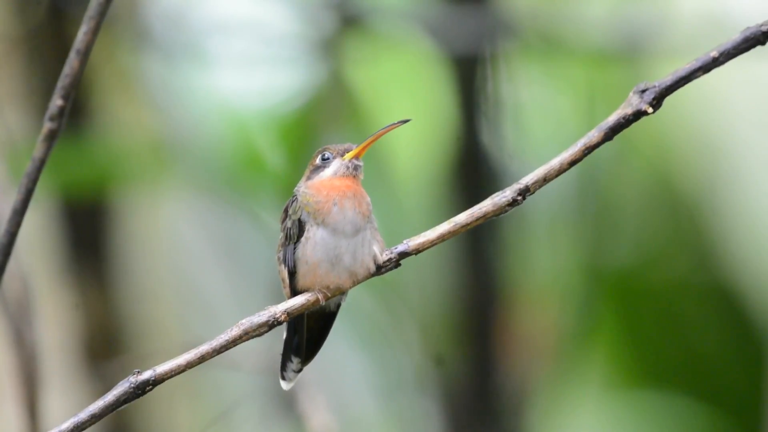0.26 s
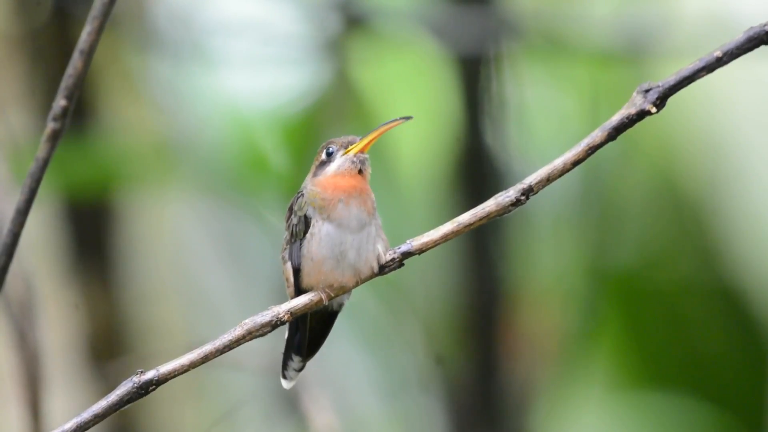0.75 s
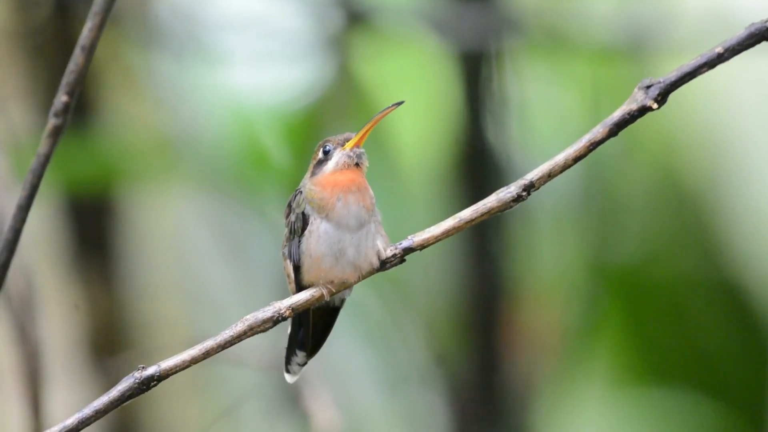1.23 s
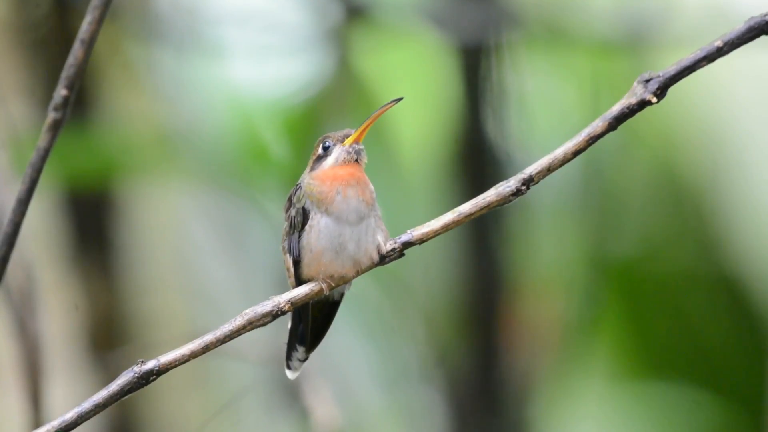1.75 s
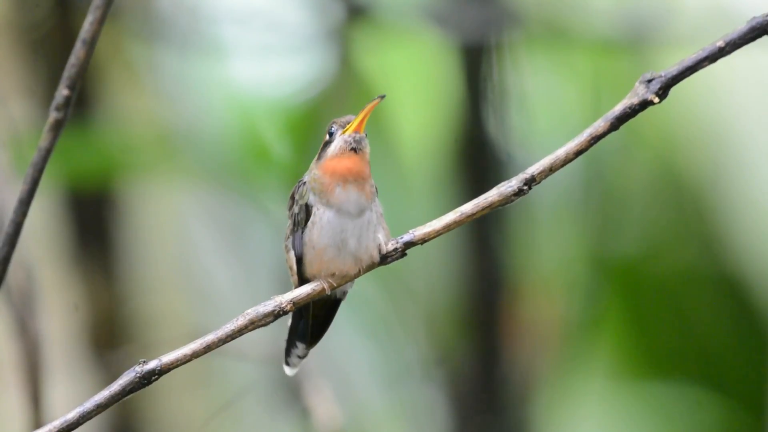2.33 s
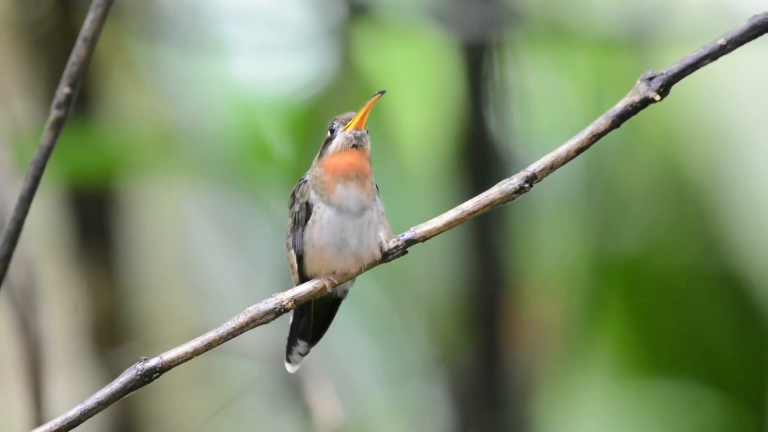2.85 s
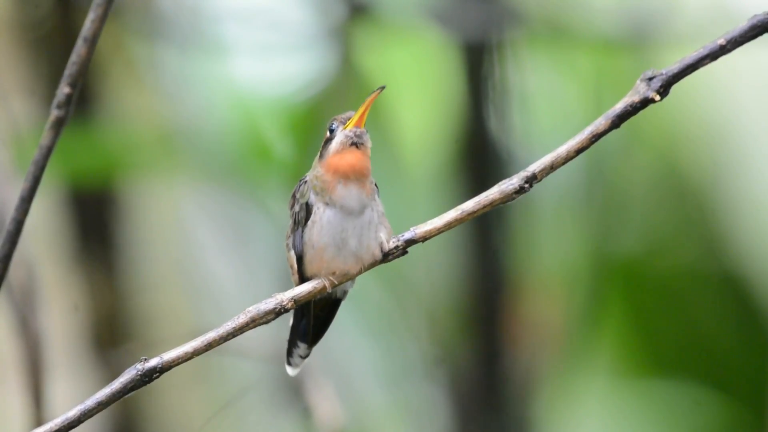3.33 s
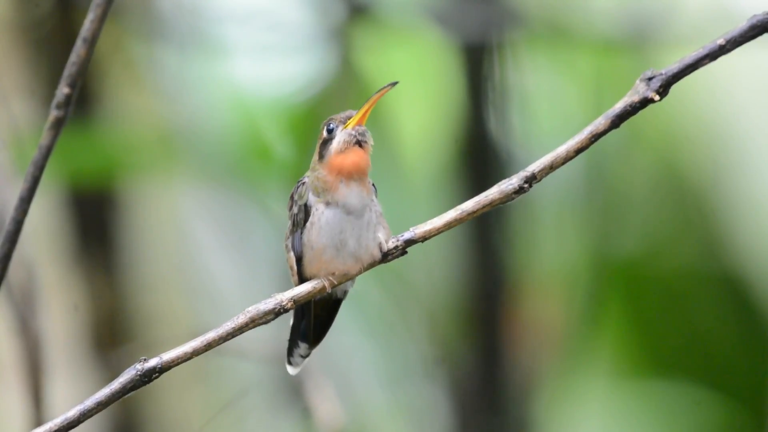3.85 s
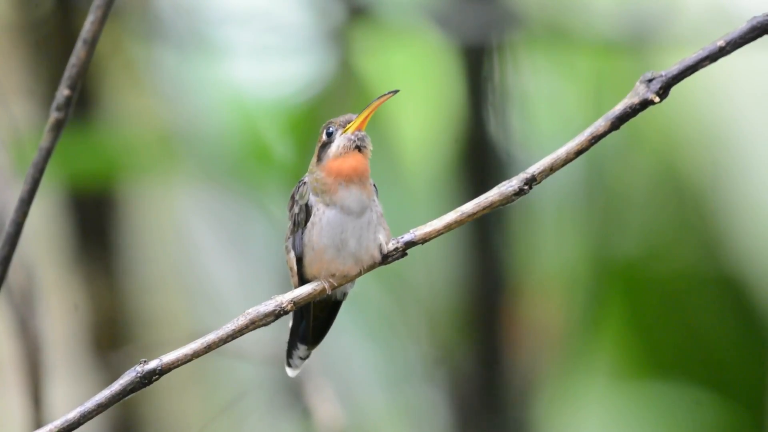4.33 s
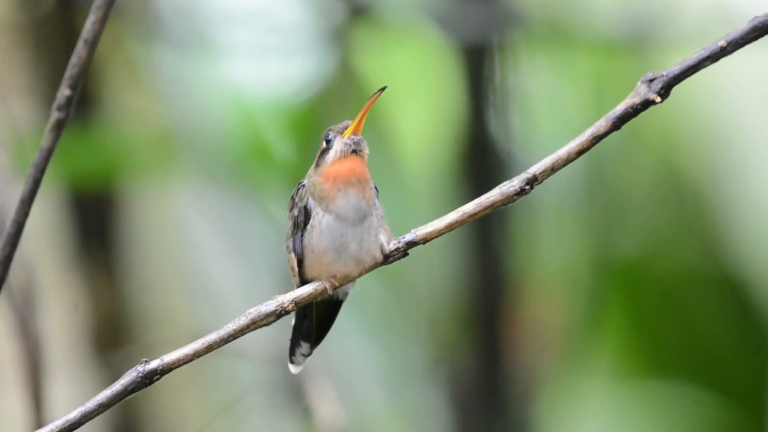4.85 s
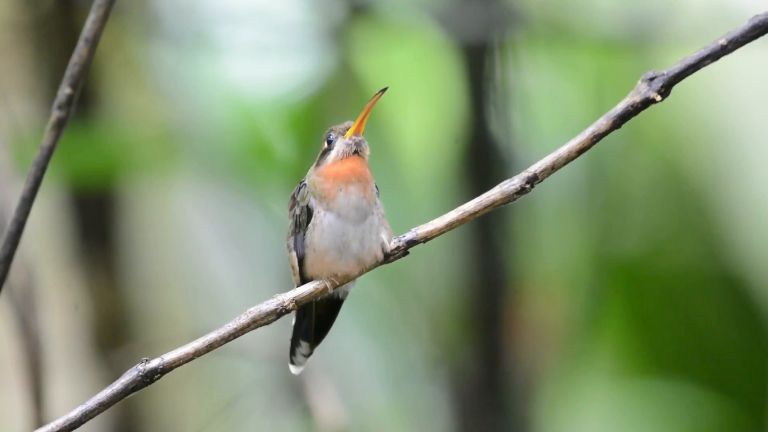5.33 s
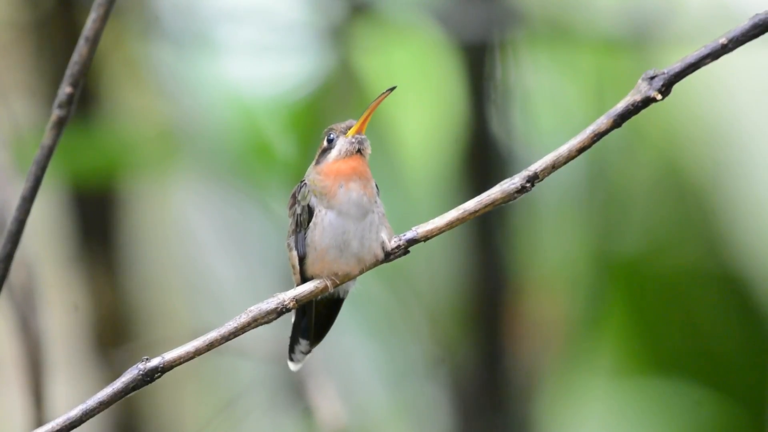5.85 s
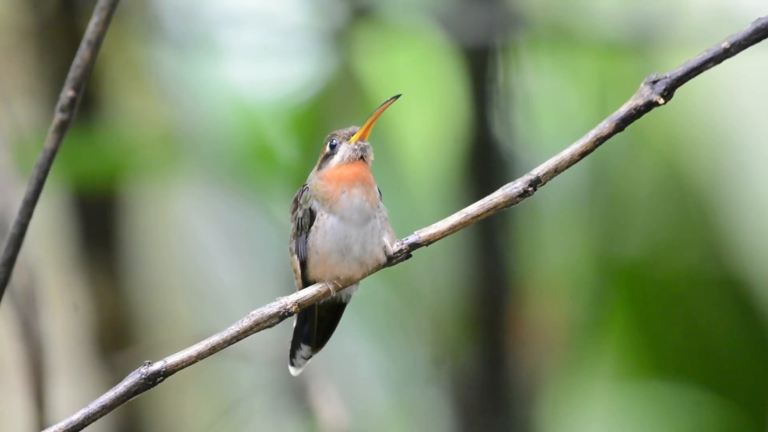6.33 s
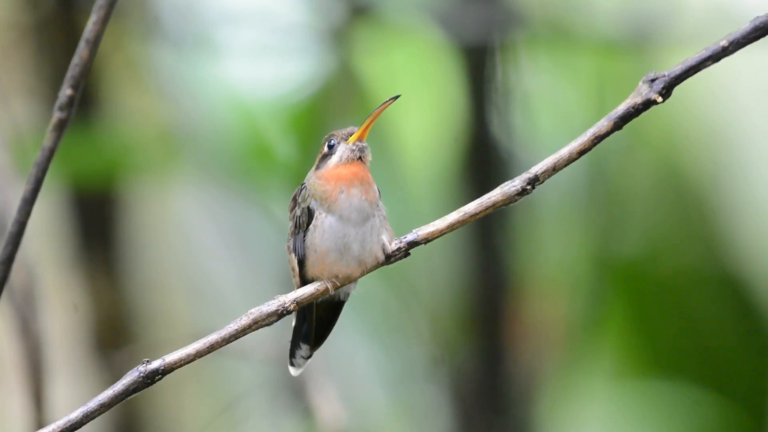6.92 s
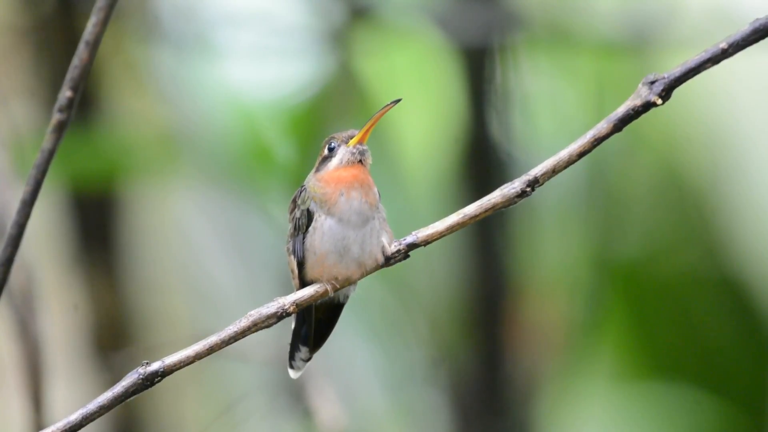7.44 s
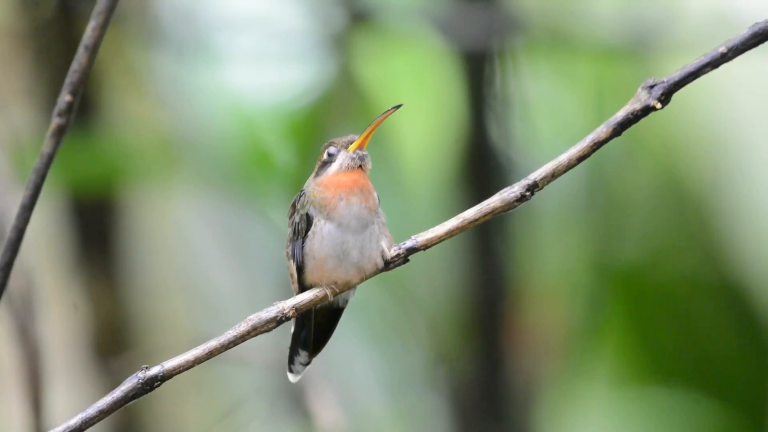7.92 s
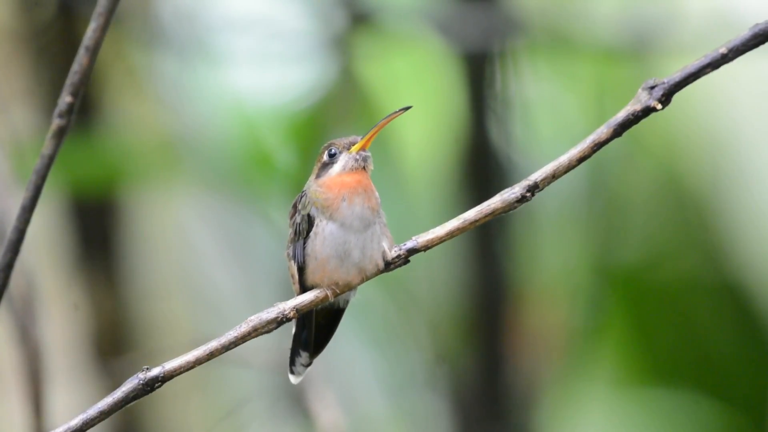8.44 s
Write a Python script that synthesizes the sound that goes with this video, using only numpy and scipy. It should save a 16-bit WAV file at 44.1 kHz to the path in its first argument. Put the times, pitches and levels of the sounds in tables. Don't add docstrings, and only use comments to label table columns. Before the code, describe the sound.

In a damp forest, a small hummingbird close to the microphone sings very high, needle-thin squeaks: two softer sagging whistles first, then a louder, rapid phrase of buzzes, chips and swooping whistles. Light leaf reflections follow each note. Irregular drips, dry ticks, a faint cricket shimmer and a gentle wide hiss continue throughout; far birds answer almost inaudibly after the song stops.

```python
import sys
import numpy as np
from scipy import signal
from scipy.fft import rfft, irfft
from scipy.io import wavfile
from scipy.ndimage import uniform_filter1d

SR = 44100
rng = np.random.default_rng(int(sys.argv[2]) if len(sys.argv) > 2 else 0)


def unload_audio(sound):
    columns = np.transpose(np.atleast_2d(sound))
    steps = np.round(np.clip(columns, -1, 1) * 32767)
    wavfile.write(sys.argv[1], SR, steps.astype(np.int16))


def field_ratio(decibels):
    return 10 ** (np.asarray(decibels, dtype=float) / 20)


N = 382788

# (time [s], length [s], level [dB], start pitch [Hz], end pitch [Hz])
SAGGING_WHISTLES = [
    (0.75, .2, -28, 10100, 8380),
    (1.02, 0.16, -27.5, 9740, 7800),
    (2.787, 0.086, -21.5, 9440, 8060),
    (4.376, 0.23, -22, 9490, 8074),
    (4.684, 0.15, -22.5, 9360, 7990),
]
# (time [s], length [s], level [dB], start pitch [Hz], end pitch [Hz])
DIVING_WHISTLES = [
    (2.595, 0.14, -18.5, 9770, 8164),
    (3.811, 0.16, -18.5, 9360, 7230),
    (4.029, 0.13, -18.5, 9120, 7300),
]
# (time [s], length [s], level [dB], start pitch [Hz], end pitch [Hz])
PIPS = [
    (2.025, .027, -19, 10300, 9600),
    (3.315, .021, -19, 9600, 9550),
]
# (share of fall in the early drop [0-1], bow of the rest [exponent], swell [dB], fade [dB])
SAG_SHAPE, DIVE_SHAPE = (0.44, 0.67, 1.5, 0.5), (0.12, 1.77, -2.5, -3)
PIP_SHAPE = (0, 2, -16, -4)
# (time [s], length [s], level [dB], first pitch [Hz], top pitch [Hz])
CHIPS = [
    (2.356, 0.043, -17, 4330, 9140),
    (2.437, 0.03, -20, 4326, 8850),
    (3.529, 0.025, -19, 7550, 8780),
    (3.581, 0.018, -27.5, 5400, 8750),
]
# (flip rate [1/s], time of one pitch top [s], start [s], end [s], high setting [Hz])
TRILLS = [
    (225, 2.0885, 2.082, 2.135, 9150),
    (52.8, 3.0858, 3.058, 3.152, 8950),
    (212, 3.392, 3.384, 3.472, 8950),
]
# (squareness [1], choke [dB/kHz], share of the low setting's climb the high one follows [1])
FAST_FLIP, SLOW_FLIP = (0.8, 0.3, 0), (2.6, 7.0, 1.1)
# (time [s], level [dB], low pitch [Hz])
TRILL_BREATHS = [
    [(2.08, -54, 8600), (2.087, -25, 6200), (2.115, -29.5, 6900), (2.135, -22, 8300), (2.17, -22.5, 8850),
     (2.21, -18.5, 9150), (2.277, -25.5, 9180)],
    [(3.048, -27, 4700), (3.057, -26.5, 5400), (3.12, -25, 5750), (3.157, -23, 6900), (3.163, -35, 10600),
     (3.168, -24, 7000), (3.181, -21, 8100), (3.224, -21, 8950), (3.237, -17, 9000)],
    [(3.374, -26.5, 9900), (3.384, -26, 8000), (3.39, -23, 5900), (3.43, -23.5, 6500), (3.47, -19.5, 7600),
     (3.474, -26.5, 10300), (3.477, -16, 8420), (3.5, -27, 8700), (3.512, -51, 8700)],
]
# (frequency [Hz], gain [dB])
THROAT = [(4000, -35), (5400, -30), (6400, -23), (7300, -5), (8400, 0), (10000, -1), (11500, -4),
          (16500, -1.5)]
OVERTONE_LEVELS = [-15.5, -11.5]
# (frequency [Hz], left minus right [dB])
HEAD_TURN = [(7000, 0), (10000, -1), (12000, -1), (16000, -6.5)]
# (time [s], length [s], start pitch [Hz], end pitch [Hz], level [dB])
RIVALS = [(4.947, 0.11, 9050, 9550, -54), (5.097, 0.16, 9750, 8840, -58.5), (5.35, 0.24, 9750, 7800, -57.5),
          (5.699, 0.15, 9050, 7800, -55.5), (6.074, 0.072, 9400, 7580, -54),
          (6.276, 0.047, 9500, 7900, -55), (6.515, .06, 9735, 9420, -59), (6.598, 0.19, 8470, 9100, -58),
          (6.87, 0.13, 9200, 8870, -63), (7.086, 0.14, 9700, 7980, -54.5), (7.352, 0.073, 9600, 7830, -62),
          (7.74, 0.075, 9000, 9100, -61), (7.957, 0.1, 8130, 8930, -57), (8.375, .12, 9370, 7420, -55),
          (8.578, 0.087, 9100, 8500, -63)]
# (time [s], peak level [dB], leaf resonance [Hz], brightness [dB])
DROPS = [(0.143, -39, 900, -13), (0.198, -36.5, 970, -38), (0.256, -45, 711, -23),
         (0.405, -32.5, 1540, -17), (0.707, -44, 1010, -19), (0.837, -41, 850, -28),
         (1.016, -41, 1160, -15), (1.116, -34.5, 1660, -22), (1.229, -40, 1350, -2), (1.416, -37, 1260, 0),
         (1.707, -42, 860, -22), (2.209, -41, 2130, -14), (2.707, -41, 1863, -23), (2.914, -40, 1740, -40),
         (2.964, -37, 1060, -8), (3.016, -39, 2600, 0), (3.166, -34.5, 950, -12), (3.713, -41, 1000, -16),
         (3.926, -36, 1420, -16.5), (4.044, -35.5, 1680, -36), (4.616, -39, 676, -11),
         (5.278, -37.5, 1580, -13), (5.769, -41, 1430, -15), (6.023, -41, 1830, -5), (6.882, -41, 3370, -7),
         (7.474, -40.5, 797, -11), (7.594, -40.5, 1300, -10), (7.831, -36.5, 1430, -25),
         (7.861, -40, 595, -11), (7.927, -40.5, 2740, -13)]
# (time [s], peak level [dB], low part level [dB])
SNAPS = [(0.7068, -49, -48), (0.7244, -47, -42), (1.1155, -38, -37), (1.1268, -53, -43),
         (1.4162, -36.5, -37), (5.0294, -58, -46), (5.245, -50, -45), (5.7998, -53, -48),
         (5.8494, -44, -47), (6.3889, -28.5, -65), (6.8833, -59, -49), (7.861, -45, -53),
         (7.9997, -48, -61), (8.104, -43, -60), (8.4166, -58, -44)]
# (frequency [Hz], width [Hz], level [dB], throb rate [1/s], throb depth [dB])
CRICKETS = [
    (6830, 90, -61, 11.9, 13.0),
    (7000, 200, -67, 11.9, 4.0),
    (7170, 220, -66, 24, 4.0),
    (7350, 180, -66, 35, 4.0),
]
# (frequency [Hz], density [dB per Hz])
WASH_SPECTRUM = [(20, -30), (45, -25), (100, -12.5), (300, -4), (1100, -2), (3200, -6.5), (8000, -10),
                 (10200, -14)]
# (frequency [Hz], likeness [1])
WASH_LIKENESS = [(60, 1), (180, 0.77), (550, 0.85), (1650, 0.9), (4970, 0.62), (15000, 0.11)]
# (time [s], level [dB])
PATTER = [(0.0, 3), (.5, 3.5), (1.9, 1.5), (2.44, 4), (4.1, 2.5), (5.44, 1.5), (8.68, 0.5)]
# (frequency [Hz], share [0-1])
PATTER_SHARE = [(250, 0), (600, 0.9), (2500, 1), (6000, 0.6)]


def hummingbird():
    song = np.zeros(N)
    whistle_kinds = ((SAGGING_WHISTLES, SAG_SHAPE), (DIVING_WHISTLES, DIVE_SHAPE), (PIPS, PIP_SHAPE))
    for rows, shape in whistle_kinds:
        for row in rows:
            add(song, *whistle(*row, *shape))
    for row in CHIPS:
        add(song, *chip(*row))
    for trill, kind, breath in zip(TRILLS, (FAST_FLIP, SLOW_FLIP, FAST_FLIP), TRILL_BREATHS):
        add(song, *buzz(*trill, *kind, breath))
    song = signal.sosfilt(signal.butter(2, 2500, "high", fs=SR, output="sos"), song)
    dull = signal.sosfilt(signal.butter(3, 11000, fs=SR, output="sos"), song)
    close_scatter = field_ratio(-3.5) * foliage(song, 0.16, 0.0037)
    long_tail = field_ratio(-15.0) * foliage(dull, 0.63, 0.045)
    out = field_ratio(-2.5) * song + close_scatter + long_tail
    lean_db = read(HEAD_TURN, np.fft.rfftfreq(N, 1 / SR)) * np.array([[0.5], [-0.5]])
    return irfft(rfft(out) * field_ratio(lean_db), N)


def whistle(start, length, db, start_hz, end_hz, drop, bow, swell_db, fade_db):
    t = np.arange(0, length, 1 / SR)
    left = 1 - t / length
    fall = drop * np.exp(-t / 0.022) + (1 - drop) * left ** bow
    hz = end_hz + (start_hz - end_hz) * fall
    scoop = 0.018 * np.exp(-t / 0.0018)
    shutting = 0.076 * np.exp((t - length) / 0.00097)
    attack_db = -9 * np.exp(-t / 0.011)
    level_db = db + attack_db + swell_db * left ** 3.15 + fade_db * (1 - left) ** 4.7
    return start, syrinx(level_db, hz * (1 - scoop - shutting))


def buzz(rate, top, begin, end, high_hz, square, choke_db, follow, breath):
    s, *columns = np.transpose(breath)
    t = np.arange(s[0], s[-1], 1 / SR)
    level_db, low_hz = (uniform_filter1d(np.interp(t, s, c), size=60, mode="nearest") for c in columns)
    high_hz = high_hz + follow * (low_hz - np.interp(top, t, low_hz))
    trilling = uniform_filter1d(1.0 * ((t > begin) & (t < end)), size=120)
    swing_hz = np.maximum(high_hz - low_hz, 0) * trilling
    wobble = 0.12 * smooth_noise(len(t), 300)
    turn = 2 * np.pi * rate * (t - top) + wobble
    flip = np.tanh(square * np.cos(turn)) / np.tanh(square)
    hz = low_hz + swing_hz * (0.5 + 0.5 * flip) ** 1.5
    hz = hz - 0.07 * swing_hz * np.sin(turn)
    swing_khz = swing_hz / 1000
    choked_db = level_db - choke_db * swing_khz * np.maximum(np.cos(turn - 0.35), 0) ** 2
    return s[0], syrinx(choked_db, hz, strain_db=1.8 * swing_khz)


def chip(start, length, db, first_hz, top_hz):
    rise_s, rise_power, floor_hz = 0.0148, 3.2, 4300
    t = np.arange(0, length, 1 / SR)
    depth_hz = top_hz - floor_hz
    joined = np.log(max(depth_hz / (top_hz - first_hz), 1)) ** (1 / rise_power)
    to_go = np.exp(-(joined + t / rise_s) ** rise_power)
    level_db = db - 11 * to_go - 80 * t
    return start, syrinx(level_db, top_hz - depth_hz * to_go, strain_db=5.5)


def syrinx(level_db, hz, waver=0.0035, strain_db=0):
    hz = hz * (1 + waver * smooth_noise(len(hz), 60))
    turns = np.cumsum(hz) / SR
    breath_noise = uniform_filter1d(rng.standard_normal(len(hz)), size=150)
    level_db = level_db + 1.5 * evened(uniform_filter1d(breath_noise, size=150))
    out = np.zeros(len(hz))
    partials_db = [0] + [db + strain_db for db in OVERTONE_LEVELS]
    for k, db in enumerate(partials_db, 1):
        audible = k * hz < SR * 0.45
        out += field_ratio(db + read(THROAT, k * hz)) * audible * np.sin(2 * np.pi * k * turns)
    n = np.arange(len(hz))
    edge_s = np.minimum(n, n[::-1]) / SR
    return np.sqrt(2) * field_ratio(level_db) * out * np.clip(edge_s / 0.0015, 0, 1)


def rivals():
    song = np.zeros(N)
    for s, length, start_hz, end_hz, db in RIVALS:
        u = np.linspace(0, 1, round(length * SR))
        level_db = db + 6 * np.log(np.sin(np.pi * u) + 0.23)
        hz = end_hz + (start_hz - end_hz) * (1 - u) ** 1.5
        add(song, s, syrinx(level_db, hz, 0.0155))
    return foliage(song, 1.0, 0.0045)


def drops():
    out, t = np.zeros(N), np.arange(3000) / SR
    small = rng.random((120, 4)) * [N / SR, 7.0, 2000, 8.0] + [0, -50.5, 604, -19]
    for s, db, hz, bright_db in list(DROPS) + list(small):
        crackle_db = 1.4 * rng.standard_normal(len(t) // 50)
        shake = rng.standard_normal(len(t)) * field_ratio(crackle_db).repeat(50)
        leaf = 0.99 * narrow(shake, hz, 510) + 0.49 * narrow(shake, 1960, 810)
        leaf = leaf + field_ratio(bright_db + 12.0) * narrow(shake, 3450, 3000)
        hit = field_ratio(-60 * t / 0.055) + 1.2 * field_ratio(-60 * t / 0.006)
        late = round(0.019 * rng.uniform(0.6, 1.2) * SR)
        bounce = field_ratio(-3) * np.roll(hit, late) * (np.arange(len(t)) >= late)
        add(out, s, field_ratio(db + 0.1) * peaked(leaf * (hit + bounce)))
    for s, db, low_db in SNAPS:
        crack = rng.standard_normal(len(t)) + 3 * (t == 0)
        fade = field_ratio(-60 * t / 0.0025) + 0.12 * field_ratio(-60 * t / 0.04)
        high, low = narrow(crack, 12500, 6000), narrow(crack, 3300, 4500)
        add(out, s, field_ratio(db + 6.0) * peaked(high * fade) + field_ratio(low_db + 10.5) * peaked(low * fade))
    out = signal.sosfilt(signal.butter(3, 350, "high", fs=SR, output="sos"), out)
    return out + field_ratio(-10.5) * foliage(out, 0.32, 0.0066)


def crickets():
    out = np.zeros((2, N))
    for hz, width, db, rate, throb_db in CRICKETS:
        drift = 1 + 0.035 * smooth_noise(N, 9000)
        beat = np.sin(2 * np.pi * np.cumsum(rate * drift) / SR)
        throb = field_ratio(-throb_db * np.maximum(beat, 0) ** 2)
        a, b = rng.standard_normal((2, N))
        ears = np.array([a, 0.97 * a + 0.13 * b])
        out += field_ratio(db) * evened(throb * narrow(ears, hz, width))
    return out


def wash():
    frames, hz = N // 128 + 6, np.fft.rfftfreq(512, 1 / SR)
    a, b, c, d, patches = rng.standard_normal((frames, 257, 5)).T
    patches = uniform_filter1d(patches, size=8, axis=0)
    patches = evened(uniform_filter1d(patches, size=20, axis=1))
    flicker = smooth_noise(frames, 12)
    same = np.clip(read(WASH_LIKENESS, hz), -1, 1)[:, None]
    left = a + 1j * b
    right = same * left + np.sqrt(1 - same ** 2) * (c + 1j * d)
    z = np.array([left, right]) * field_ratio(0.9 * patches + 0.75 * flicker)
    s, db = np.transpose(PATTER)
    swell_db = np.interp(np.arange(frames) * 128 / SR, s, db)
    z *= field_ratio(read(PATTER_SHARE, hz)[:, None] * swell_db)
    noise = signal.istft(z, nperseg=512, noverlap=384)[1][:, :N]
    color_db = read(WASH_SPECTRUM, np.fft.rfftfreq(N, 1 / SR))
    return field_ratio(-51.5) * evened(irfft(rfft(noise) * field_ratio(color_db), N))


def foliage(x, t60, start):
    taps = np.zeros((2, SR))
    at = np.arange(0, SR - 20, 20) + rng.integers(0, 20, (2, (SR - 1) // 20))
    np.put_along_axis(taps, at, rng.choice([-1., 1.], at.shape), 1)
    t = np.arange(SR) / SR
    taps *= field_ratio(-60 * t / t60) * (1 - np.exp(-t / start))
    taps[1] = 0.6 * taps[0] + 0.73 * taps[1]
    taps /= np.linalg.norm(taps, axis=1, keepdims=True)
    return signal.fftconvolve(x[None], taps, axes=1)[:, :N]


def narrow(x, hz, width):
    r = np.exp(-np.pi * width / SR)
    poles = [1, -2 * r * np.cos(2 * np.pi * hz / SR), r * r]
    return evened(signal.lfilter([1], poles, signal.lfilter([1], poles, x)))


def smooth_noise(count, size):
    return evened(uniform_filter1d(rng.standard_normal(count), size=size))


def evened(x):
    return x / np.sqrt(np.mean(x ** 2) + 1e-20)


def peaked(x):
    return x / np.max(abs(x))


def read(points, hz):
    f, value = np.transpose(points)
    return np.interp(np.log(hz + 1), np.log(f + 1), value)


def add(mix, s, sound):
    part = mix[round(s * SR):][:len(sound)]
    part += sound[:len(part)]


def scene():
    return hummingbird() + rivals() + drops() + crickets() + wash()


def low_pass(x):
    return signal.sosfilt(signal.butter(12, 17000, fs=SR, output="sos"), x)


def record(dry):
    hz, t, z = signal.stft(dry, SR, nperseg=1024)
    power = (abs(z) ** 2).mean(0)
    band_power = uniform_filter1d(uniform_filter1d(power, size=14, axis=0), size=3, axis=1)
    band_db = 10 * np.log10(band_power + 1e-20)
    loud_db = 10 * np.log10(uniform_filter1d(power.sum(0), size=7, origin=1) + 1e-20)
    chance = rng.standard_normal((len(t) // 4 + 1, 37)).repeat(4, 0).repeat(14, 1)
    chance = chance.T[:len(hz), :len(t)]
    hz = hz[:, None]
    limit_db = loud_db - 44.5 - 7.0 * np.sqrt(abs(hz - 9600) / 1000) + 2.5 * chance
    z *= np.where((band_db < limit_db) & (hz > 9600), 0.02, 1)
    z *= np.where(hz > 15950, field_ratio(-52), 1)
    mix = signal.istft(z, SR, nperseg=1024)[1][:, :N]
    return low_pass(mix)


dry = scene()
out = record(dry)
unload_audio(out)
```